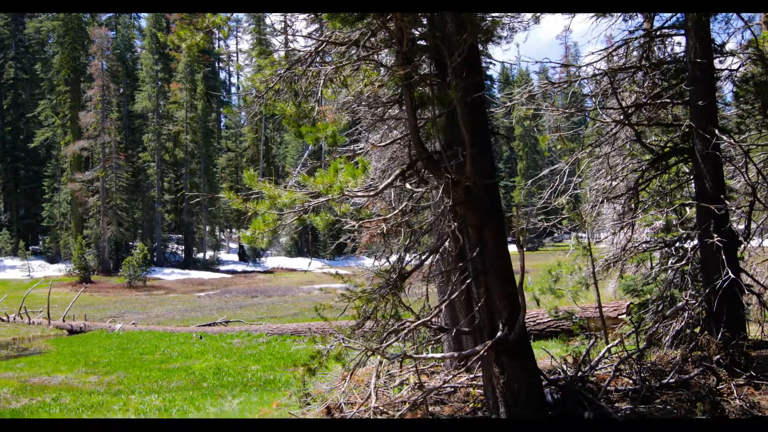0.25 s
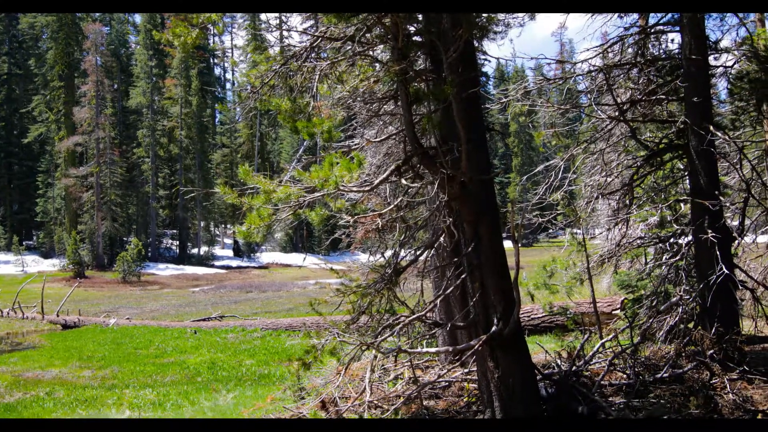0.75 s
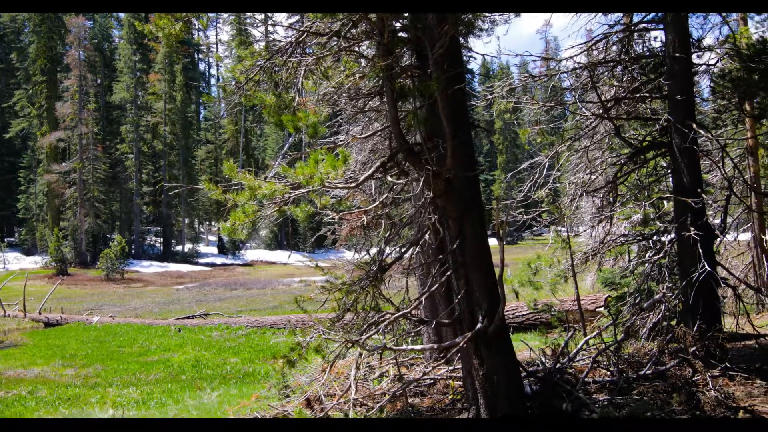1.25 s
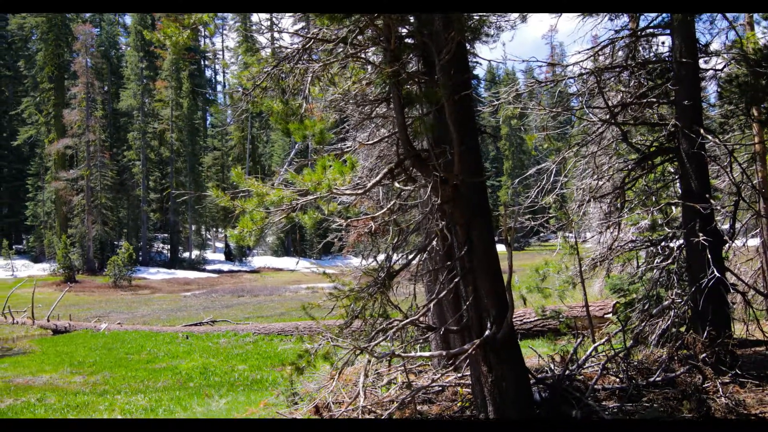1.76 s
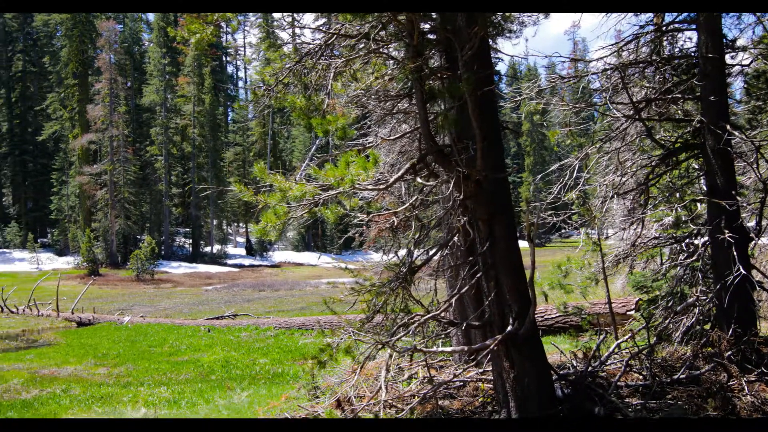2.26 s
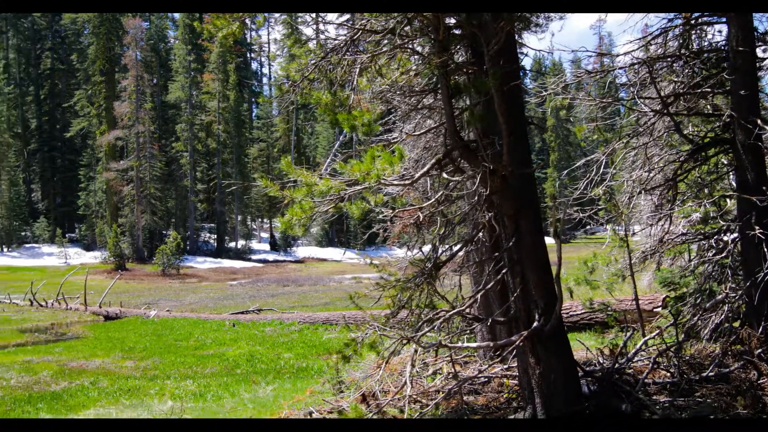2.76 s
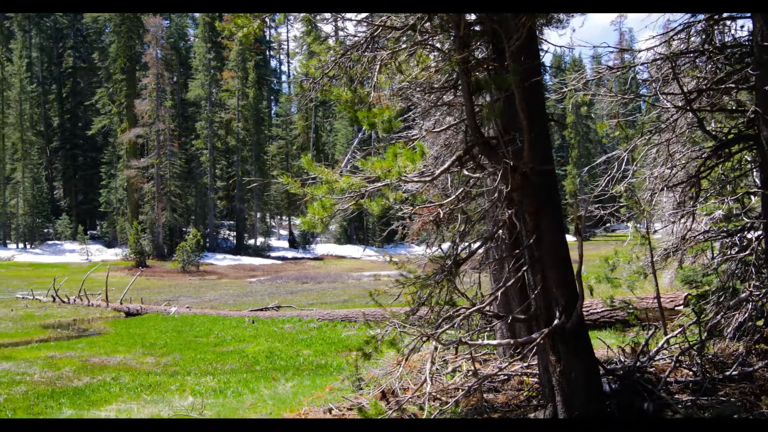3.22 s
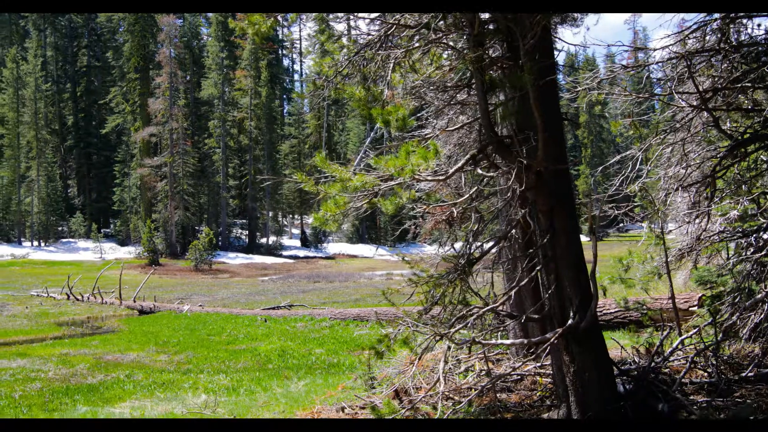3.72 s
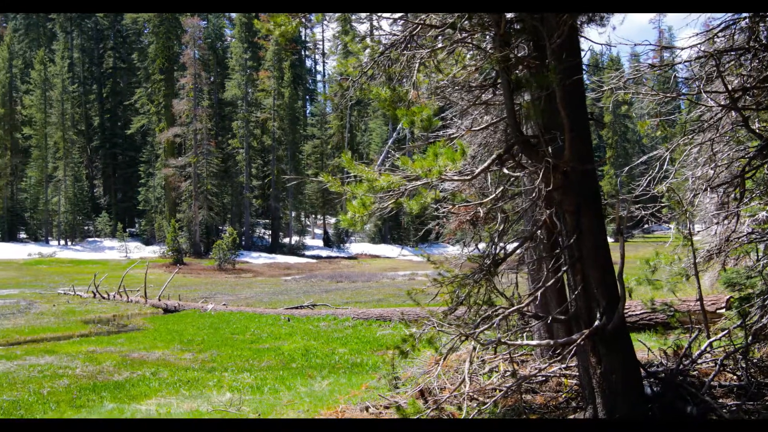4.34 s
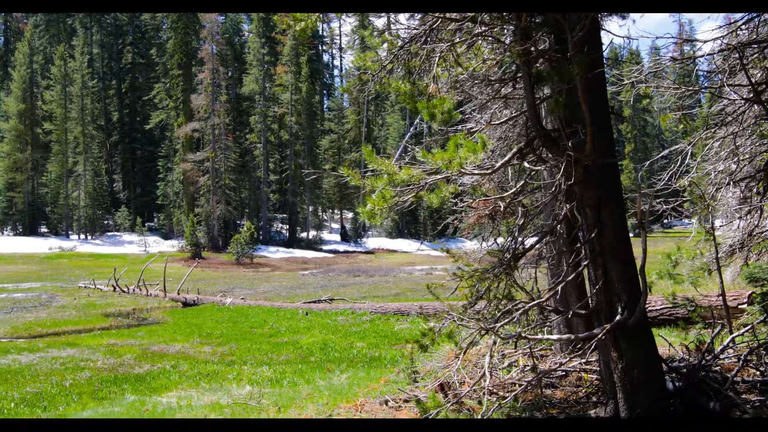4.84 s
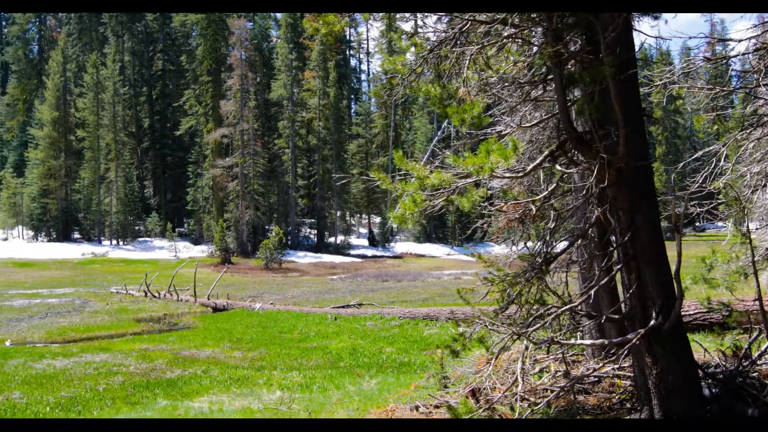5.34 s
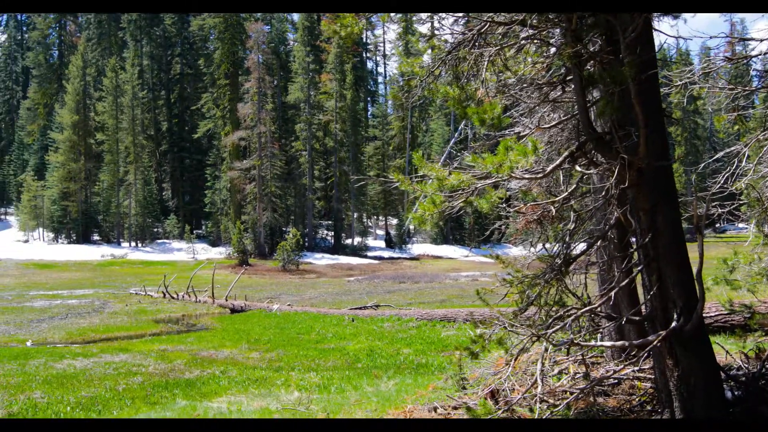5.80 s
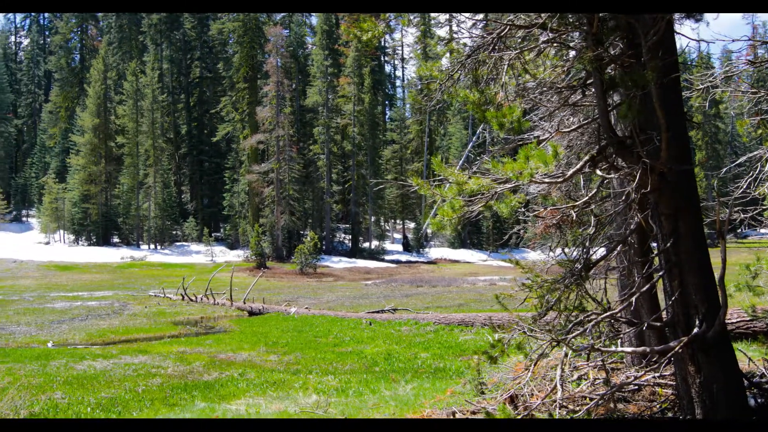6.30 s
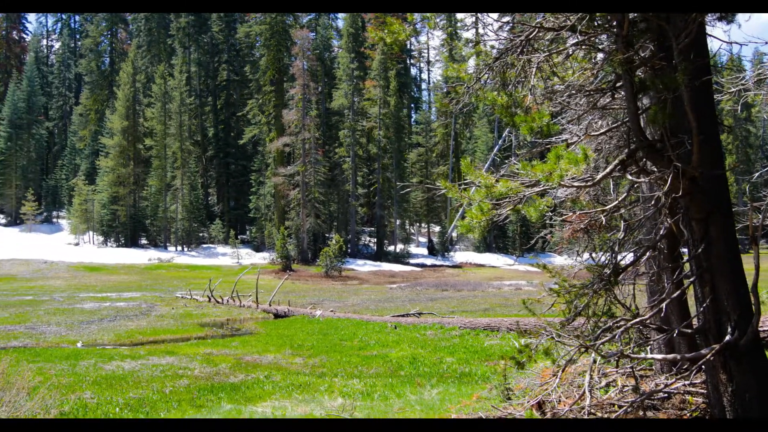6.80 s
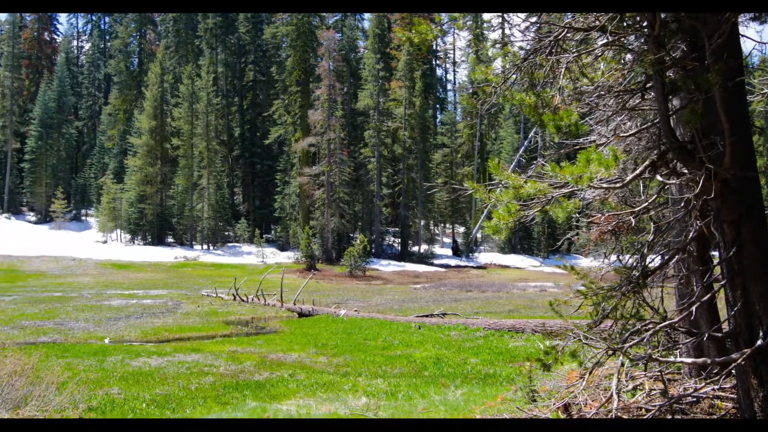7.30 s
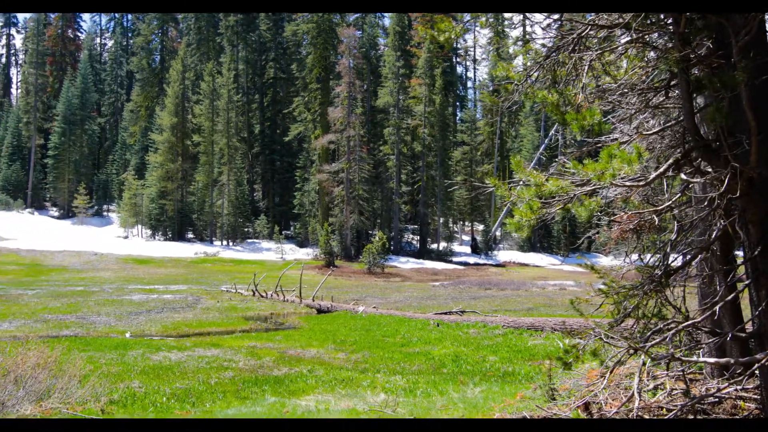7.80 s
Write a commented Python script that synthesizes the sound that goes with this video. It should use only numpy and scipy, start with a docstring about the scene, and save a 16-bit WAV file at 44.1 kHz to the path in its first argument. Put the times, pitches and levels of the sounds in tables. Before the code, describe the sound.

In a wet meadow edged by conifers, frogs close to the microphone croak continuously in quick two-part pulsed trills, one deeper frog buzzing about twice a second. A grainy far chorus fills in behind. Low air puffs bump the microphone early; birds warble from about one second to five, then again near seven, much quieter than the frogs, with soft forest echo.

```python
"""From the start, frogs close to the microphone trade pulsed croaks over a far chorus in a wet meadow.
Puffs of air bump the microphone, mostly early on; from about 1 s birds run through sweeps and warbles.
A tap comes near 2.2 s, twigs tick near 3.5 and 5 s, and whistles are heard on and off; from 7 s the
birds take up their refrain again, and a far hoot falls near the end. Frogs are pulsed or buzzing
tones, the far chorus is pulsed noise, birds are gliding sines, and air and echoes are shaped noise."""
import sys
import numpy as np
from scipy import signal
from scipy.fft import rfft, irfft
from scipy.io import wavfile
from scipy.ndimage import uniform_filter1d, map_coordinates

SR = 44100
rng = np.random.default_rng(int(sys.argv[2]) if len(sys.argv) > 2 else 0)


def pcm_store(signal):
    """Save signal as 16-bit PCM."""
    levels = np.round(np.clip(np.atleast_2d(signal), -1, 1) * 32767)
    wavfile.write(sys.argv[1], SR, levels.astype(np.int16).T)


N = 355446
TIME = np.arange(N) / SR

# Levels in the tables are relative; the sources and the mix add their own gains.
# the nearest, deepest frog, a buzz then a short trill:
# (time [s], wait until the trill [s], throat pitch [Hz], level [dB])
DEEP_CROAKS = [(0.521, 0.1, 1641, -33), (0.97, 0.082, 1680, -39), (1.4, 0.093, 1675, -30),
               (1.807, 0.091, 1677, -38), (2.162, 0.093, 1652, -33), (2.626, 0.064, 1655, -33.5),
               (2.888, 0.093, 1669, -33), (3.411, 0.056, 1662, -32.5), (3.68, 0.082, 1656, -34.5),
               (4.175, 0.07, 1659, -33.5), (4.4, 0.088, 1685, -32.5), (4.878, 0.062, 1640, -34),
               (5.178, 0.08, 1658, -34.5), (5.538, 0.076, 1630, -32), (6.045, 0.11, 1647, -34),
               (6.605, 0.09, 1598, -37.5), (7.051, 0.052, 1698, -36), (7.828, 0.065, 1653, -34.5),
               (7.899, 0.078, 1626, -37.5)]
# its higher neighbours, two trills each: (time [s], wait until the second [s], pulses in the first [count],
# first pitch [Hz], second pitch [Hz], first level [dB], second level [dB])
TWO_NOTE_CROAKS = [(0.175, 0.12, 8, 1963, 2114, -36.5, -30.5), (0.381, 0.091, 6, 1930, 2080, -36.5, -39),
                   (0.488, 0.068, 3, 2090, 2090, -36, -39), (0.63, 0.048, 5, 1830, 2060, -37.5, -34),
                   (.735, .083, 6, 1850, 1950, -40, -41), (0.902, 0.11, 7, 2026, 2050, -31.5, -32),
                   (1.068, 0.095, 6, 2060, 2120, -29, -35), (1.312, 0.096, 7, 1860, 1990, -39, -41),
                   (1.441, 0.091, 8, 1924, 1930, -35.5, -31.5), (1.786, .15, 9, 2000, 2090, -35, -30),
                   (1.885, .14, 6, 1952, 2080, -34, -30), (2.275, .1, 5, 2010, 2120, -31.5, -33.5),
                   (2.552, .1, 7, 1914, 2020, -35.5, -37), (2.65, 0.077, 4, 1904, 2030, -36, -29.5),
                   (2.92, .075, 6, 2050, 2130, -40, -36), (2.998, .088, 4, 1810, 1930, -30, -33.5),
                   (3.164, .119, 6, 1990, 2110, -34.5, -30), (3.342, .14, 7, 1890, 1910, -35, -33.5),
                   (3.507, .096, 6, 1994, 1976, -32, -35), (3.77, 0.08, 4, 1846, 1945, -31.5, -35),
                   (3.9, 0.063, 7, 2124, 2150, -44, -47), (3.972, 0.08, 5, 1806, 1940, -33.5, -34),
                   (4.17, .09, 6, 1880, 1950, -38, -31), (4.478, .101, 9, 1966, 2060, -31, -28.5),
                   (4.743, .075, 4, 1785, 1900, -35.5, -38), (4.945, .11, 5, 2030, 2070, -34, -32.5),
                   (5.202, .083, 6, 1850, 1880, -38, -31), (5.3, .107, 5, 1992, 2110, -32, -30),
                   (5.47, .09, 5, 2024, 2110, -38.5, -33), (5.815, .087, 6, 1820, 1960, -39, -34),
                   (6.25, .1, 6, 2040, 1980, -35, -39), (6.335, 0.098, 7, 1890, 2014, -39.5, -32),
                   (6.446, 0.11, 7, 2007, 2110, -34.5, -31), (6.731, 0.074, 6, 1786, 1905, -36, -30.5),
                   (6.975, .14, 4, 1790, 1914, -40.5, -36), (7.15, 0.091, 5, 2006, 2056, -36.5, -35),
                   (7.345, .066, 7, 1746, 1830, -39, -35), (7.462, .106, 6, 1950, 2100, -31, -30.5),
                   (7.7, .107, 8, 1850, 2020, -37.5, -36), (7.83, 0.076, 5, 2035, 2040, -38, -41)]
# partials of a croak: (multiple of the throat pitch [ratio], level [dB])
THROAT_PARTIALS = [(1 / 2, -18.5), (1, 0), (3 / 2, -28), (1.3, -31)]
# colour of the far chorus, main band and lower band: (frequency [Hz], level [dB])
CHORUS_UPPER_COLOUR = [(900, -83), (1400, -12.5), (1550, 3), (1700, 1), (1950, 8.5), (2150, 3.5),
                       (2300, -6.5), (2500, -16.5), (2900, -14), (3200, -19), (3500, -27.5), (4100, -29),
                       (5200, -40), (8000, -38)]
CHORUS_LOWER_COLOUR = [(300, -12.5), (560, -13.5), (700, -8.5), (820, -3.5), (950, 1.5), (1090, 5),
                       (1200, -1.5), (1350, -7.5), (2400, -105)]
# loudness of those two bands: (time [s], level [dB])
CHORUS_UPPER_LEVEL = [(0.0, -33), (0.58, -32.5), (0.87, -34.5), (1.8, -36), (2.04, -34), (2.47, -37),
                      (3.57, -35.5), (4.29, -36.5), (4.4, -35.5), (4.53, -37.5), (5.46, -32.5), (5.63, -33),
                      (5.86, -37), (6.64, -35), (6.91, -35), (7.34, -36.5), (7.65, -36), (8.06, -32)]
CHORUS_LOWER_LEVEL = [(0.0, -45), (1.17, -46), (1.28, -51.5), (1.39, -44.5), (1.71, -50.5), (2.31, -45),
                      (2.36, -52.5), (2.76, -42.5), (2.83, -53), (3.01, -46.5), (5.41, -46.5), (5.5, -41),
                      (5.63, -42), (5.74, -52), (6.2, -46), (6.64, -48.5), (6.71, -40.5), (6.82, -46),
                      (6.89, -48), (8.06, -47)]
# bird sweeps that stand out: (time [s], length [s], start pitch [Hz], end pitch [Hz], level [dB])
ACCENTS = [(0.0, 0.19, 11850, 10100, -74.5), (0.942, 0.021, 3770, 4200, -60), (0.97, .018, 3650, 4400, -66),
           (0.999, 0.03, 5100, 3600, -65), (1.071, 0.034, 3700, 4200, -61), (1.105, 0.017, 3540, 4400, -57),
           (1.133, 0.028, 5000, 3550, -61.5), (1.237, 0.02, 3600, 4400, -64),
           (1.211, 0.024, 3700, 4230, -56.5), (1.274, 0.032, 5050, 3600, -60.5),
           (1.34, .02, 5400, 6400, -74), (1.462, 0.024, 5300, 6400, -69.5),
           (1.587, .018, 5420, 6450, -67.5), (1.673, 0.032, 3700, 2560, -55.5),
           (1.97, 0.13, 4470, 3600, -59), (2.138, .03, 2880, 2613, -53), (2.16, 0.018, 2600, 3400, -54),
           (2.175, 0.028, 3350, 2688, -52.5), (2.226, 0.029, 2570, 3100, -50),
           (2.243, 0.04, 3100, 3200, -50.5), (2.234, 0.05, 10800, 10330, -72),
           (2.311, .07, 11300, 10270, -75), (2.323, 0.033, 4200, 4767, -63),
           (2.367, 0.023, 4200, 3406, -66), (2.375, 0.0434, 6100, 5670, -70),
           (2.474, 0.057, 3310, 4234, -53.5), (2.528, 0.015, 4600, 2960, -53),
           (2.556, 0.034, 3324, 2960, -46.5), (2.659, 0.039, 2603, 3280, -45.5),
           (2.784, .018, 4640, 3390, -57), (2.797, 0.056, 3740, 4600, -57),
           (2.826, 0.094, 4420, 4500, -62.5), (2.88, 0.0275, 3000, 3964, -65),
           (2.958, 0.04, 3230, 2655, -48.5), (2.975, 0.016, 5300, 4300, -67),
           (2.994, 0.014, 5270, 4300, -66), (3.02, 0.024, 4900, 5300, -69), (3.074, 0.046, 4490, 3600, -62),
           (3.083, .05, 2750, 2450, -53), (3.168, 0.018, 5450, 4200, -68), (3.193, .018, 4900, 4000, -65),
           (3.206, 0.048, 3500, 4010, -56.5), (3.243, 0.042, 2910, 3900, -54),
           (3.273, 0.035, 2850, 3720, -50.5), (3.311, .035, 2730, 3600, -49.5),
           (3.404, 0.034, 4900, 5250, -67), (3.46, .045, 4750, 3700, -67),
           (3.483, 0.026, 3650, 2680, -49.5), (3.601, 0.04, 2650, 3460, -53), (3.63, .035, 5070, 4600, -76),
           (3.68, 0.034, 3340, 2615, -51), (3.766, 0.03, 4130, 3700, -62), (3.803, 0.037, 3400, 2510, -52),
           (3.871, 0.044, 3200, 3900, -58), (3.91, .15, 11170, 10840, -73.5),
           (3.966, 0.059, 3760, 2724, -54), (4.068, .14, 11060, 10950, -74),
           (4.105, 0.025, 4500, 3700, -67), (4.142, .025, 3880, 3000, -61), (4.265, 0.04, 2600, 3100, -48),
           (4.3, 0.033, 3040, 3210, -52), (4.33, .075, 3160, 3200, -62), (4.32, .03, 6100, 7100, -75),
           (4.344, .028, 7150, 6400, -73.5), (4.33, 0.023, 4730, 4350, -73), (4.572, .03, 4700, 4200, -70),
           (4.605, .035, 4900, 5000, -74), (4.387, 0.066, 4830, 3800, -68.5),
           (4.465, 0.028, 3090, 2500, -49), (4.519, 0.042, 3250, 3950, -58), (4.54, 0.041, 7900, 7000, -76),
           (4.632, 0.047, 3700, 2600, -54), (4.716, 0.028, 3600, 4200, -63),
           (4.659, 0.049, 4600, 3750, -65), (4.696, 0.019, 4100, 4350, -69), (4.797, 0.02, 5140, 4500, -68),
           (4.8, .025, 3200, 3450, -60), (4.823, 0.048, 3960, 4070, -62), (4.88, 0.028, 4840, 4528, -69),
           (4.92, 0.027, 4210, 3570, -63), (6.297, 0.082, 7070, 7350, -67.5),
           (6.574, 0.079, 11170, 10600, -71), (7.122, 0.027, 4180, 3450, -67),
           (7.34, .035, 10100, 10700, -75), (7.42, .06, 10130, 10500, -74), (7.47, 0.079, 10300, 9900, -76),
           (7.488, 0.042, 4190, 3900, -59), (7.61, .09, 10000, 11030, -78), (7.632, 0.015, 3400, 2570, -47),
           (7.725, 0.09, 11400, 10100, -75), (7.92, 0.038, 5460, 3620, -68), (7.945, .022, 5900, 3800, -68),
           (7.962, 0.019, 5800, 3800, -64), (7.955, 0.025, 2864, 3940, -65),
           (7.958, 0.099, 4600, 3720, -55)]
# quavering notes: (time [s], length [s], pitch [Hz], level [dB])
QUAVERS = [(1.756, 0.159, 3560, -51.5), (7.714, 0.16, 3560, -48.5)]
# thin whistles: (time [s], length [s], settled pitch [Hz], level [dB])
WHISTLES = [(0, 0.15, 6600, -97), (1.578, 0.12, 7100, -94), (1.93, 0.14, 7180, -88),
            (2.42, 0.137, 6800, -103), (3.66, 0.15, 7850, -99), (3.79, .2, 8030, -100),
            (3.93, 0.11, 6700, -100), (6.147, 0.17, 7240, -97), (4.095, 0.13, 8000, -102),
            (4.27, 0.1, 6750, -97), (4.552, 0.12, 6760, -98), (4.86, 0.12, 6850, -96),
            (5.142, 0.14, 7000, -93), (6.647, 0.13, 7000, -88), (6.806, 0.065, 7770, -96),
            (6.886, 0.12, 7360, -99), (7.107, 0.13, 7090, -88), (7.461, 0.17, 7380, -84),
            (7.796, 0.19, 7440, -80.5)]
# spells of a repeated bird figure: (start [s], end [s], figure to figure [s], level [dB])
REFRAINS = [(1.709, 2.45, 0.177, -67), (7.174, 7.72, .169, -66)]
# sweeps of that figure: (share of the way through [ratio], length [s], start [Hz], end [Hz], level [dB])
FIGURE = [(-.02, 0.0314, 5320, 4640, -2), (0.384, 0.028, 3680, 4770, 1), (0.525, .024, 3400, 4400, 2),
          (0.71, .03, 4320, 3530, 4.5)]
# dry rattling twitters: (time [s], length [s], level [dB])
RATTLES = [(1.078, .05, -74), (1.32, .06, -77), (2.608, .055, -76), (2.713, .06, -68)]
# spells of fainter song further off: (start [s], end [s], middle pitch [Hz], level [dB])
FAR_SONGS = [(0.91, 1.3, 3620, -66), (1.295, 1.7, 5560, -71), (1.651, 3.4, 3465, -60.5),
             (2.302, 2.8, 6400, -74.5), (3.404, 4.3, 3322, -59.5), (4.305, 4.93, 3630, -62.5),
             (4.305, 4.65, 6800, -77), (7.102, 8.06, 3390, -68)]
# faint ticks of twigs: (time [s], level [dB])
TWIG_TICKS = [(3.51, -51), (5.024, -52)]
# puffs of air on the microphone: (time of peak [s], length [s], level [dB])
GUSTS = [(0.039, 0.123, -55), (0.317, 0.033, -46), (0.38, 0.0266, -36), (0.545, 0.046, -46),
         (0.646, 0.037, -41), (0.96, 0.039, -58), (1.16, 0.021, -57), (2, 0.14, -49.5), (2.343, 0.08, -55),
         (3.45, 0.36, -66), (6.97, 0.15, -59), (7.37, 0.44, -54.5), (7.528, 0.024, -48)]
# colour of still air and microphone hiss: (frequency [Hz], level [dB])
AIR_COLOUR = [(25, -32), (90, -10), (190, 1), (300, -4.8), (450, -6.5), (650, -6), (1500, -7), (3000, -13),
              (5500, -29.5), (7000, -26.5), (8500, -31), (10300, -24), (12500, -26.5), (15600, -29)]

# frog pulses: mean time to the peak, then fall in pitch per rise time (share)
FIRST_RISE_S, SECOND_RISE_S, DEEP_RISE_S = .0032, .0029, .0035
PULSE_GLIDE = -.035  # the sac slackens
TRILL_RISE, PULSE_SCATTER = .035, .014  # pitch climb over a trill; spread between pulses (shares)
DEEP_STEP, DEEP_TRILL_DB = 1.085, 1  # the trill against the buzz: pitch ratio, level
BUZZ_SHARE, BUZZ_FADE_S = .76, .032  # body as a share of the wait; time added at each end
BUZZ_RISE, BUZZ_PULSES_PER_S = .055, 139  # pitch climb (share); throb rate
FIRST_PULSES_PER_S, SECOND_PULSES_PER_S, SECOND_PULSES = 110, 92, 4
CRESCENDO_DB, SECOND_LEAD_DB, SECOND_FADE_DB = 4.5, .5, 3
ANSWER_DB, ANSWER_SPREAD_S = -9, .035  # against the near frog; greatest lead or lag
ANSWER_LOW_HZ, ANSWER_HIGH_HZ = 1720, 2160
SEDGE_DB, SEDGE_DECAY_S = -7.5, .008  # reflections by sedge and water round each frog
FROG_ECHO_DB = -8
QUAVERS_PER_S, WHISTLE_SWELL_DB = 29, 4.5
SWEEPS_PER_S, SWEEP_S, SWEEP_SPAN = 13, .037, .277  # far song: rate, mean length, change of log pitch
SONG_OCTAVES, SONG_DB_PER_OCTAVE = .62, -27  # spread of its pitches; high sweeps are fainter
RATTLE_TICKS_PER_S, RATTLE_TICK_S = 85, .008
RATTLE_TOP_HZ, RATTLE_END_HZ = 8400, 6400
# near branches blur the birds, far trunks echo them: 60 dB decay time and level
BIRD_BLUR_S, BIRD_BLUR_DB, BIRD_ECHO_S, BIRD_ECHO_DB = .13, -6, .85, -5
CALM_DB = -73.5  # eddies between the puffs, on the scale of the gusts
AIR_DB = -56.8
CUTOFF_HZ = 15650


def from_db(db):
    """Turn decibels into gain."""
    return 10 ** (np.asarray(db) / 20)


def rms_one(x):
    """Scale to unit power."""
    return x / np.sqrt(np.mean(x ** 2) + 1e-20)


def seconds(length_s):
    """Sample times of one short sound."""
    return np.arange(int(length_s * SR)) / SR


def level_curve(rows):
    """Join (time, level) points by straight lines."""
    s, db = np.transpose(rows)
    return np.interp(TIME, s, db)


def add(out, s, sound):
    """Mix a sound in at a time."""
    start = int(np.clip(round(s * SR), 0, N))
    out[start:start + len(sound)] += sound[:N - start]


def coloured(x, spectrum):
    """Shape a flat sound by a spectrum, then bring it to unit power."""
    hz, db = np.transpose(spectrum)
    bins = np.maximum(np.arange(N // 2 + 1) * SR / N, 1)
    gain = from_db(np.interp(np.log(bins), np.log(hz), db))
    return rms_one(irfft(rfft(x) * gain, N))


def band(x, low_hz, high_hz):
    """Pass a band with gentle slopes."""
    sos = signal.butter(2, [low_hz, min(high_hz, .45 * SR)], "band", fs=SR, output="sos")
    return signal.sosfilt(sos, x)


def wander(t, per_s):
    """Drift smoothly and at random about zero, with a spread of about 1."""
    return map_coordinates(rng.standard_normal(256), [t * per_s], order=2, mode="wrap")


def swell(t, edge):
    """Round the ends of a note."""
    return signal.windows.tukey(len(t), np.clip(edge, 0, 1))


def forest(x, t60_s, delay_s):
    """Trunks around the meadow return a scattered echo that builds up quickly and dies away."""
    t = seconds(1)
    echoes = rng.standard_normal(SR) * from_db(-60 * t / t60_s) * (1 - np.exp(-t / delay_s))
    return signal.fftconvolve(x, echoes / np.sqrt(np.sum(echoes ** 2)))[:N]


def throat(turns):
    """The vocal sac favours the second harmonic of the cords, among weaker partials."""
    partials = [from_db(db) * np.sin(2 * np.pi * (k * turns + rng.random())) for k, db in THROAT_PARTIALS]
    return np.sqrt(2) * sum(partials)


def pulse(hz, rise_s, glide):
    """One opening of the larynx: a few cycles that start sharply and die, sliding down in pitch."""
    t = seconds(.016)
    age = t / rise_s
    outline = (age * np.exp(1 - age)) ** 2.5
    return outline * throat(hz * t * (1 + glide * (age / 2 - 1)))


def sedge(note):
    """Quick reflections roughen and colour each note differently; its power stays."""
    t = np.arange(SR // 25) / SR
    paths = rng.standard_normal(len(t)) * np.exp(-t / SEDGE_DECAY_S)
    reflected = signal.fftconvolve(note, paths / np.linalg.norm(paths))[:len(note)]
    return rms_one(note + from_db(SEDGE_DB) * reflected) * np.std(note)


def trill(hz, db, per_s, rise_s, growth_db, count, lead_db=0):
    """A train of slightly uneven pulses climbs a little in pitch."""
    out = np.zeros(SR // 4)
    for k, (size_db, pitch, width_db) in enumerate(rng.standard_normal((count, 3))):
        along = (k + .5) / count - .5
        pulse_hz = hz * (1 + TRILL_RISE * along + PULSE_SCATTER * pitch)
        sound = pulse(pulse_hz, rise_s * from_db(width_db), PULSE_GLIDE)
        pulse_db = db + growth_db * along + size_db + lead_db * (k == 0)
        add(out, (k + .5) / per_s - rise_s, sound * from_db(pulse_db))
    return sedge(out)


def buzz(length_s, hz, db, depth, rough):
    """Pulses merge into a throbbing tone that swells, bends upward and dies away."""
    t = seconds(length_s + 2 * BUZZ_FADE_S)
    pitch = hz * (1 + BUZZ_RISE * (t / t[-1] - .5) + rough * wander(t, per_s=132))
    throb = 1 + depth * np.sin(2 * np.pi * BUZZ_PULSES_PER_S * t + wander(t, per_s=68))
    outline = np.sin(np.pi * t / t[-1]) ** 2
    return from_db(db) * outline * throb * throat(np.cumsum(pitch) / SR)


def deep_frog():
    """The nearest frog opens each croak with a buzz and ends in four pulses a step higher."""
    out = np.zeros(N)
    for s, wait, hz, db in DEEP_CROAKS:
        opening = sedge(buzz(BUZZ_SHARE * wait, hz, db, depth=.46, rough=.016))
        ending = trill(hz * DEEP_STEP, db + DEEP_TRILL_DB, per_s=104, rise_s=DEEP_RISE_S,
                       growth_db=4.5, count=4)
        add(out, s - BUZZ_FADE_S, opening)
        add(out, s + wait, ending)
    return out


def two_note_frogs(croaks):
    """A trill of swelling pulses leads to four sharper ones that weaken from a harder start."""
    out = np.zeros(N)
    for s, wait, count, first_hz, second_hz, first_db, second_db in croaks:
        first = trill(first_hz, first_db, FIRST_PULSES_PER_S, FIRST_RISE_S, CRESCENDO_DB,
                      count=int(round(count)))
        second = trill(second_hz, second_db, SECOND_PULSES_PER_S, SECOND_RISE_S, -SECOND_FADE_DB,
                       count=SECOND_PULSES, lead_db=SECOND_LEAD_DB)
        add(out, s, first)
        add(out, s + wait, second)
    return out


def answering_frogs():
    """Frogs further off croak almost together with the near ones, so the chorus comes in surges."""
    answers = []
    for s, wait, count, first_hz, second_hz, first_db, _ in TWO_NOTE_CROAKS:
        late, height = rng.random(2)
        when = s + ANSWER_SPREAD_S * (2 * late - 1)
        hz = ANSWER_LOW_HZ + height * (ANSWER_HIGH_HZ - ANSWER_LOW_HZ)
        db = first_db + ANSWER_DB
        answers.append((when, wait, count, hz, hz * second_hz / first_hz, db, db))
    return two_note_frogs(answers)


def far_frogs(count, per_s, length_s, blur):
    """Many overlapping pulse trains modulate noise, as each pulse is scattered by grass and trunks."""
    power = np.zeros(N)
    for start, speed, size, long in rng.random((count, 4)):
        t = seconds(length_s * (.5 + long))
        train = np.sin(np.pi * per_s * (.8 + .5 * speed) * t) ** 8
        add(power, start * N / SR, from_db(13 * size) * swell(t, edge=.5) * train)
    # the crowd's loudness is evened out; its pulse grain stays
    power /= uniform_filter1d(power, size=2600) + 1e-2
    return np.sqrt(np.abs(power) + abs(blur)) * rng.standard_normal(N)


def chorus(upper_db, lower_db):
    """The far chorus sounds in two bands, about an octave apart, each with its own loudness."""
    voices = far_frogs(count=170, per_s=98, length_s=.13, blur=.9)
    upper = from_db(level_curve(CHORUS_UPPER_LEVEL) + upper_db) * coloured(voices, CHORUS_UPPER_COLOUR)
    lower = from_db(level_curve(CHORUS_LOWER_LEVEL) + lower_db) * coloured(voices, CHORUS_LOWER_COLOUR)
    return upper + lower


def bird_note(t, hz, db, edge, flutter_db):
    """A near sine has a fluttering strength."""
    strength = from_db(db + flutter_db * wander(t, per_s=89.5)) * swell(t, edge)
    return np.sqrt(2) * strength * np.sin(2 * np.pi * np.cumsum(hz) / SR)


def sweep(length_s, from_hz, to_hz, db):
    """One quick, slightly unsteady slide in pitch is bowed a little up or down."""
    t = seconds(length_s)
    along = (t / length_s) ** np.exp(.221 * rng.standard_normal())
    hz = from_hz * (to_hz / from_hz) ** along * (1 + .0109 * wander(t, per_s=110))
    return bird_note(t, hz, db, edge=.28, flutter_db=3.5)


def accents(level_db):
    """Single sweeps stand out, some rising and some falling."""
    out = np.zeros(N)
    for s, length, from_hz, to_hz, db in ACCENTS:
        add(out, s, sweep(length, from_hz, to_hz, db + level_db))
    return out


def quavers(depth_hz, scoop_hz, glide_s):
    """A note scoops up to its pitch while zigzagging evenly about it."""
    out = np.zeros(N)
    for s, length, hz, db in QUAVERS:
        t = seconds(length)
        zigzag = depth_hz * signal.sawtooth(2 * np.pi * QUAVERS_PER_S * t + np.pi / 2, width=.5)
        pitch = hz + zigzag - scoop_hz * np.exp(-t / glide_s)
        add(out, s, bird_note(t, pitch, db, edge=.29, flutter_db=-3))
    return out


def whistles(level_db, drop_hz, glide_s):
    """A thin tone drops onto its pitch and grows as it settles."""
    out = np.zeros(N)
    for s, length, hz, db in WHISTLES:
        t = seconds(length)
        pitch = hz + drop_hz * np.exp(-t / glide_s) + 18 * wander(t, per_s=106)
        growing_db = db + level_db + WHISTLE_SWELL_DB * (t / length - .5)
        add(out, s, bird_note(t, pitch, growing_db, edge=.11, flutter_db=4))
    return out


def refrains():
    """One figure, a fall, two rises and a fall, comes round at an even pace."""
    out = np.zeros(N)
    for start, end, period, db in REFRAINS:
        for s in np.arange(start, end, period):
            for share, length, from_hz, to_hz, own_db in FIGURE:
                add(out, s + share * period, sweep(length, from_hz, to_hz, db + own_db))
    return out


def rattles():
    """A twitter is a fast run of tiny, steeply falling sweeps."""
    out = np.zeros(N)
    for start, length, db in RATTLES:
        for s in np.arange(start, start + length, 1 / RATTLE_TICKS_PER_S):
            add(out, s, sweep(RATTLE_TICK_S, RATTLE_TOP_HZ, RATTLE_END_HZ, db))
    return out


def far_warble(level_db):
    """A far song runs through sweeps, up and down in turn, each at a pitch of its own."""
    out = np.zeros(N)
    for start, end, middle_hz, db in FAR_SONGS:
        for k, (late, height, long) in enumerate(rng.random((40, 3))):
            s = start + (k + .5 * late) / SWEEPS_PER_S
            octaves = SONG_OCTAVES * (height - .5)
            hz = middle_hz * 2 ** octaves
            slide = np.exp((-1) ** k * SWEEP_SPAN / 2)
            sweep_db = db + level_db + SONG_DB_PER_OCTAVE * octaves
            if s < end:
                add(out, s, sweep(SWEEP_S * (.5 + long), hz / slide, hz * slide, sweep_db))
    return out


def far_hoot(s, length_s, from_hz, to_hz, db):
    """A faint, far, hoarse hoot falls, heard mostly as echo."""
    out, t = np.zeros(N), seconds(length_s)
    hz = np.geomspace(from_hz, to_hz, len(t)) * (1 + .07 * wander(t, per_s=300))
    add(out, s, bird_note(t, hz, db, edge=.23, flutter_db=6))
    return .5 * out + forest(out, t60_s=.15, delay_s=.0026)


def tap(s, db, decay_s):
    """One soft, dull tap close by is a dying burst of low noise."""
    out, t = np.zeros(N), np.arange(SR // 10) / SR
    knock = band(rng.standard_normal(len(t)) * np.exp(-t / decay_s), low_hz=224, high_hz=895)
    add(out, s, from_db(db) * rms_one(knock))
    return out


def twigs(decay_s):
    """Each tick is a tiny bright crack of dying noise."""
    out, t = np.zeros(N), np.arange(SR // 20) / SR
    for s, db in TWIG_TICKS:
        crack = band(rng.standard_normal(len(t)) * np.exp(-t / decay_s), low_hz=1500, high_hz=7000)
        add(out, s, from_db(db) * crack)
    return out


def wind(low_hz, high_hz):
    """Low eddies at the microphone swell and die with each puff."""
    puffs = sum(from_db(db) * np.exp(-(2 * (TIME - s) / length) ** 2) for s, length, db in GUSTS)
    eddies = rms_one(band(rng.standard_normal(N), low_hz, high_hz))
    return band((from_db(CALM_DB) + puffs) * eddies, low_hz=33, high_hz=300)


def still_air():
    """Still air and microphone hiss are steady, coloured noise."""
    return from_db(AIR_DB) * coloured(rng.standard_normal(N), AIR_COLOUR)


def scene():
    """Frogs in the open, birds in the trees, air all round."""
    frogs = deep_frog() + from_db(.83) * (two_note_frogs(TWO_NOTE_CROAKS) + answering_frogs())
    frog_echo = from_db(FROG_ECHO_DB) * forest(frogs, t60_s=.25, delay_s=.0013)
    near_frogs = from_db(2) * (frogs + frog_echo)
    far_chorus = chorus(upper_db=-4.5, lower_db=.55)

    song = accents(level_db=1) + quavers(depth_hz=322, scoop_hz=788, glide_s=.05)
    song += whistles(level_db=19.5, drop_hz=618, glide_s=.025) + refrains() + rattles()
    # the far song reaches the microphone only by way of branches and trunks
    all_song = song + far_warble(level_db=2)
    blur = from_db(BIRD_BLUR_DB) * forest(all_song, BIRD_BLUR_S, delay_s=.00022)
    echo = from_db(BIRD_ECHO_DB) * forest(all_song, BIRD_ECHO_S, delay_s=.0074)

    small = far_hoot(s=7.67, length_s=.16, from_hz=640, to_hz=408, db=-56)
    small += tap(s=2.217, db=-52.5, decay_s=.0042) + twigs(decay_s=.0015)
    air = wind(low_hz=37.5, high_hz=143) + still_air()
    return (near_frogs + far_chorus + song + blur + echo + small + air)[None]


def record(dry):
    """A steep low-pass cuts the top of the treble."""
    return signal.sosfilt(signal.ellip(14, .1, 70, CUTOFF_HZ, fs=SR, output="sos"), dry)


dry = scene()
out = record(dry)
pcm_store(out)
```